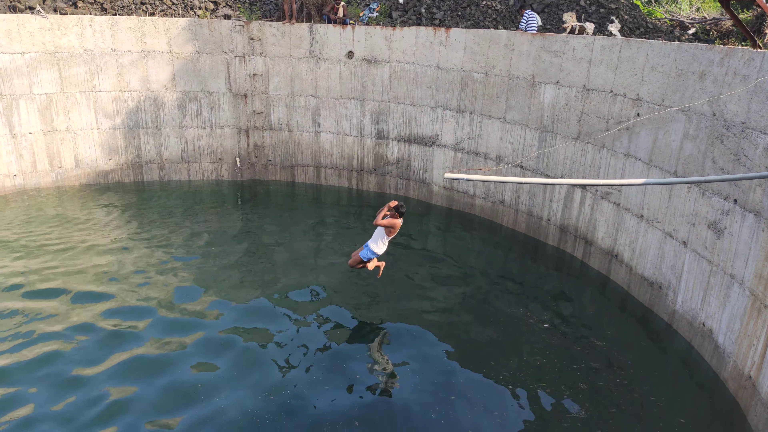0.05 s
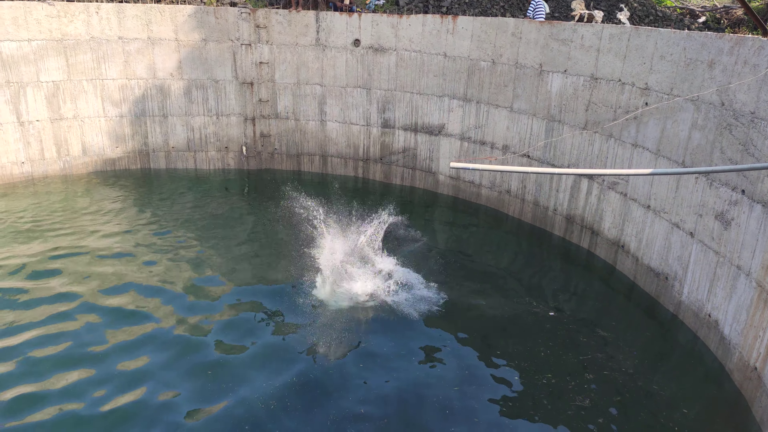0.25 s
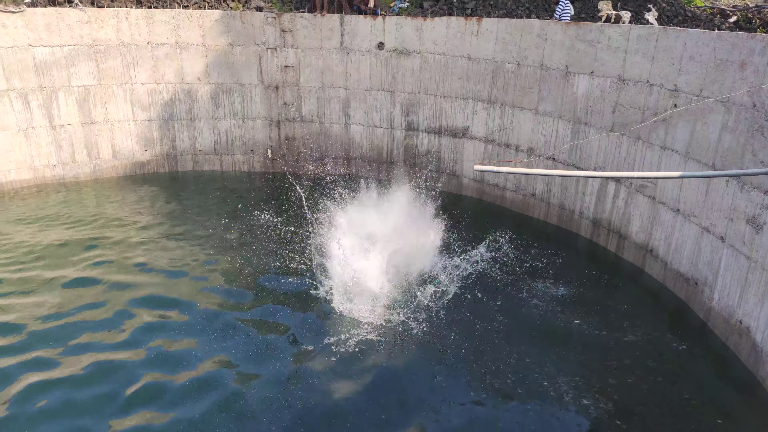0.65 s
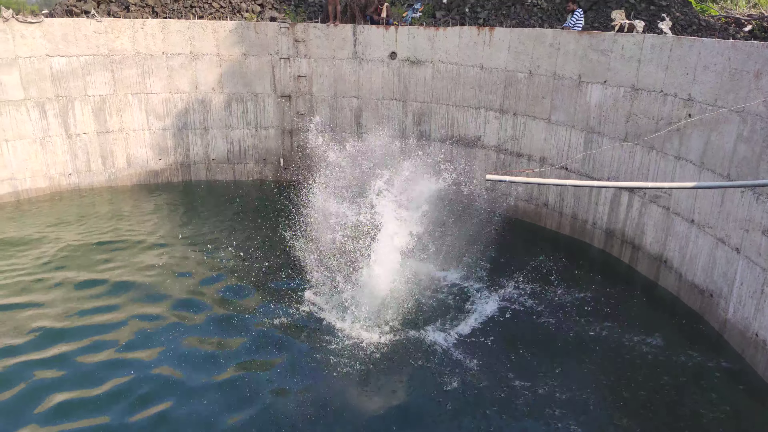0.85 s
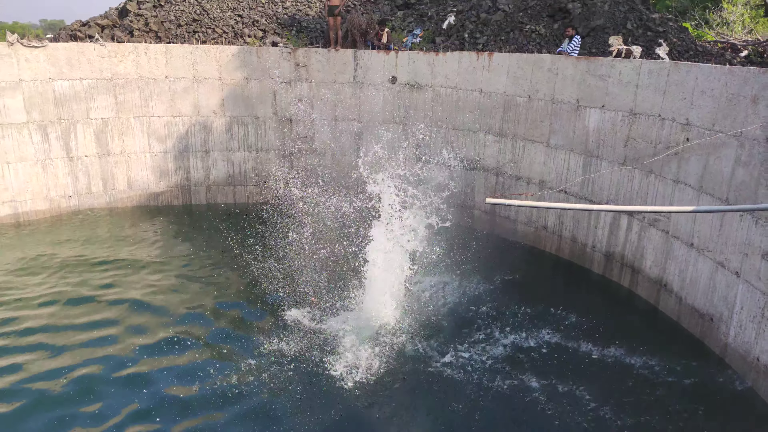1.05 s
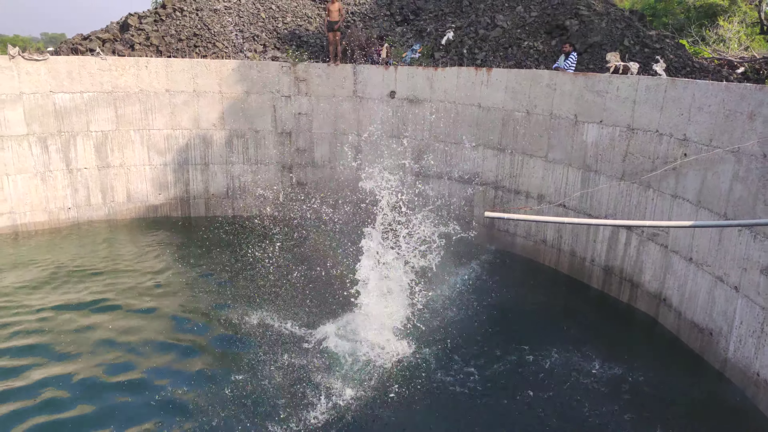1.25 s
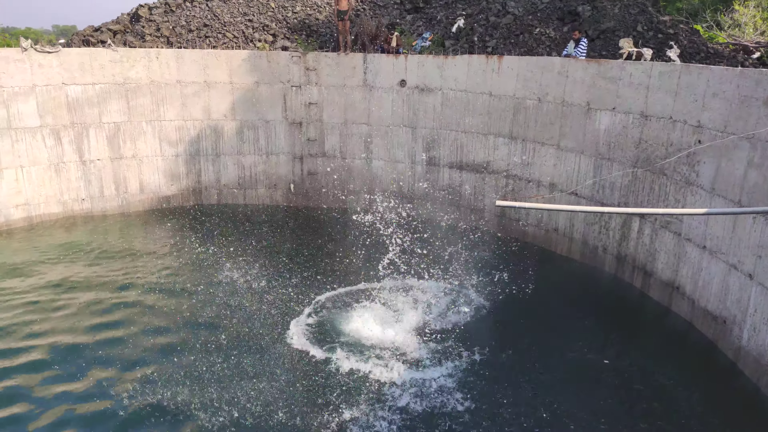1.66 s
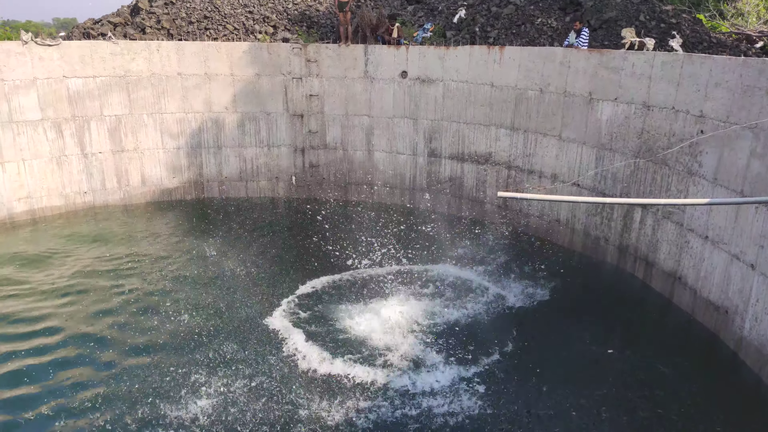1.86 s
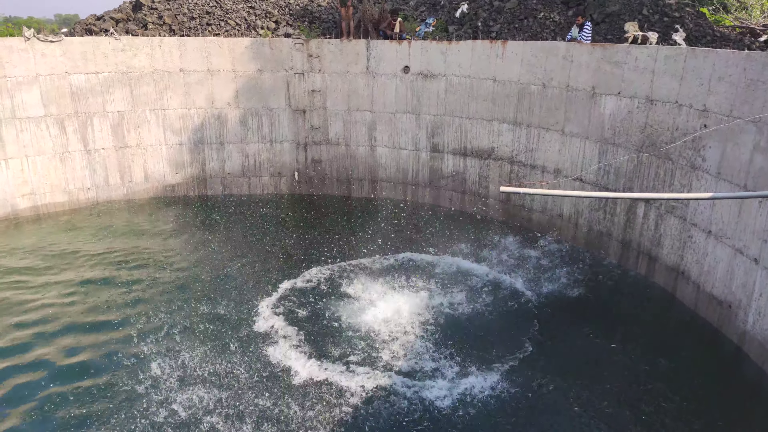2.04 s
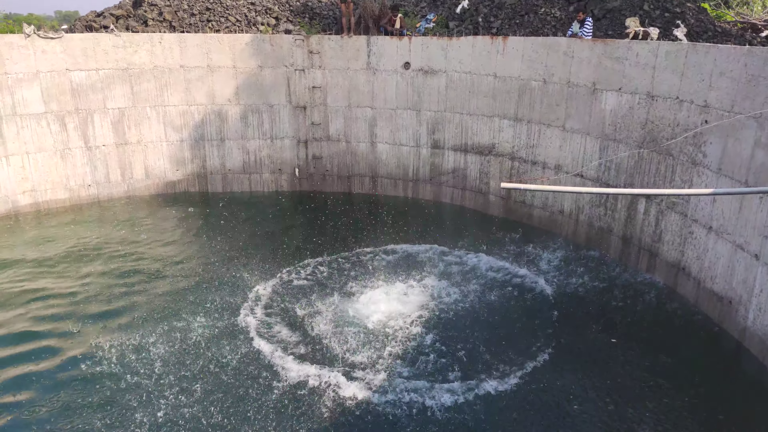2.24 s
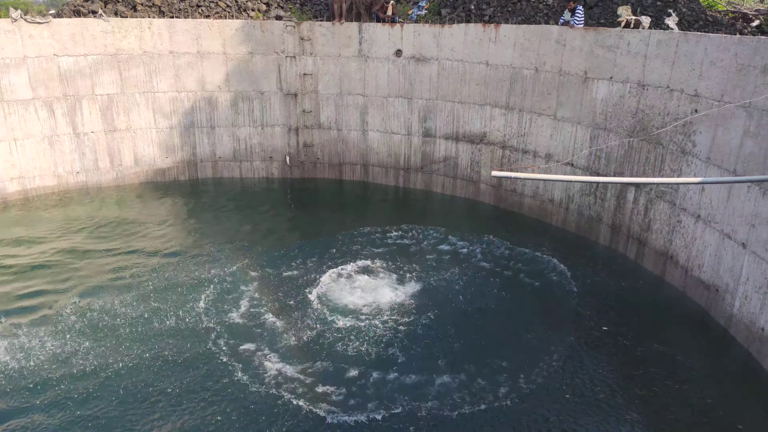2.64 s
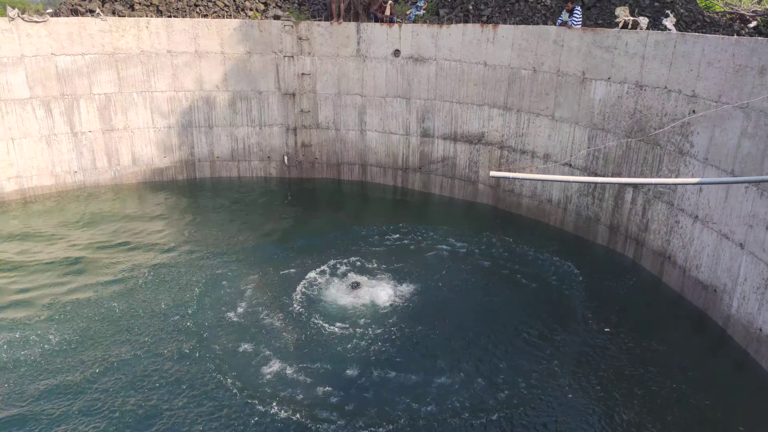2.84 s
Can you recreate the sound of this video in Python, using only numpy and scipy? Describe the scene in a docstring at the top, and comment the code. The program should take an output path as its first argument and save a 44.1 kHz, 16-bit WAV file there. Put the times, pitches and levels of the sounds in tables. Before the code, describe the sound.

A body splashes into a walled pool outdoors, slapping and churning the water. Hollow gulps follow, then fizzing, bubbling spray swells and fades with a slight echo. Soft wind puffs touch the microphone, which hears clearly only on the right.

```python
"""A person jumps into a wide stone well. Over quiet outdoor air and puffs of wind, feet and body slap the
water, which tears and churns. The air cavity caves in, pinches off with a plop and throbs. The thrown-up
spray rains back as drops and small bubbles, the central jet collapses with a gurgle, and the patter
swells, then thins to stray drops. The round wall echoes it all.
The left microphone is covered, so it hears only a muffled copy."""
import sys
import numpy as np
from scipy import signal
from scipy.fft import rfft, irfft, next_fast_len
from scipy.io import wavfile

SR = 44100
rng = np.random.default_rng(int(sys.argv[2]) if len(sys.argv) > 2 else 0)


def output_pcm(signal):
    """Save a mono or channel-first signal as 16-bit PCM at the path in sys.argv[1].

    Samples are clipped to [-1, 1] before scaling.
    """
    pcm = np.clip(np.atleast_2d(signal).T, -1, 1) * 32767
    wavfile.write(sys.argv[1], SR, np.round(pcm).astype(np.int16))


N = 132300

FINE_PER_S, HEAVY_PER_S = 5000, 2500  # density of fine and heavy drops


def undb(db):
    return 10 ** (np.asarray(db) / 20)


def clock():
    return np.arange(N) / SR


def unit(x):
    return x / np.sqrt(np.mean(x ** 2) + 1e-18)


def noise():
    return rng.standard_normal(N)


def add(out, start, sound):
    i = min(int(start * SR), N)
    out[i:i + len(sound)] += sound[:N - i]


def colour(x, points):
    """Minimum-phase EQ through (frequency [Hz], gain [dB]) points."""
    hz, db = np.array(points, float).T
    size = next_fast_len(2 * N)
    bin_hz = np.maximum(np.fft.rfftfreq(size, 1 / SR), 1)
    gain = undb(np.interp(np.log(bin_hz), np.log(hz), db))
    cepstrum = irfft(np.log(gain), size)
    cepstrum[1:size // 2] *= 2
    cepstrum[size // 2 + 1:] = 0
    return irfft(rfft(x, size) * np.exp(rfft(cepstrum)), size)[:N]


def shaped(x, envelope, points):
    """A steady texture through an envelope and an EQ; rms 1 where the envelope is 1."""
    return colour(x * envelope, points) / np.std(colour(x, points))


def swell(start, rise, hold, decay):
    """Linear attack, hold, exponential decay, all in seconds."""
    age = clock() - start
    return np.clip(age / rise, 0, 1) * np.exp(-np.maximum(age - rise - hold, 0) / decay)


def fader(points):
    """A gain ride through (time [s], level [dB]) points."""
    return undb(np.interp(clock(), *np.array(points).T))


def patter(per_s, spread_db, clumps_per_s=63, clump_db=1.0):
    """Random drop impacts of unequal size, louder and softer in clumps."""
    hit = rng.random(N) < per_s / SR
    clump = np.interp(clock() * clumps_per_s, np.arange(N), noise())
    return hit * np.sign(noise()) * undb(spread_db * np.minimum(noise(), 2.5) + clump_db * clump)


def ring(hz, t60, rise, glide):
    """A bubble: a dying sine whose pitch climbs by the share glide each second."""
    age = np.arange(int(t60 * SR) + 2) / SR
    tone = np.sin(2 * np.pi * hz * age * (1 + glide * age / 2))
    return tone * np.exp(-np.log(1000) * age / t60) * (1 - np.exp(-age / rise))


def outdoor_air():
    """A quiet, steady bed of dark noise."""
    # EQ of the air (frequency [Hz], gain [dB])
    air_eq = [(25, 0.5), (70, 0.5), (120, -9.5), (300, -10), (600, -8.5), (1000, -11), (2000, -16.5),
              (4000, -20), (6400, -25), (9000, -44), (16000, -83)]
    return undb(-61) * unit(colour(noise(), air_eq))


def wind():
    """Soft, low puffs blow across the open microphone."""
    # puffs (time [s], level [dB], half-width [s])
    puffs = [(0.058, -42, 0.012), (0.118, -49.5, 0.031), (.185, -53.5, 0.035), (0.304, -46, 0.026),
             (0.548, -37, 0.021), (1.29, -52, .025), (1.652, -59.5, 0.47), (1.996, -48.5, 0.033)]
    # their rumble (frequency [Hz], gain [dB])
    puff_eq = [(20, -12), (60, 4), (140, -0.5), (260, -7.5), (500, -20), (1500, -69)]
    gusts = sum(undb(db) * np.exp(-((clock() - at) / width) ** 2) for at, db, width in puffs)
    return shaped(noise(), gusts, puff_eq)


def wall_echo(x, predelay_s=0.042, t60_s=0.65):
    """The round stone wall returns a diffuse, warm tail."""
    # tone of the tail (frequency [Hz], gain [dB])
    wall_eq = [(60, 5.5), (350, 7.5), (1000, 4), (4000, -2.5), (15000, -10)]
    envelope = swell(predelay_s, rise=.01, hold=0, decay=t60_s / np.log(1000))
    tail = colour(unit(noise()) * envelope, wall_eq)
    return signal.fftconvolve(x, tail / np.linalg.norm(tail))[:N]


def stray_drops():
    """Lone drops go on falling as the spray thins; a few tick close by."""
    # swell and fade of the drops (time [s], level [dB])
    ride = [(.6, -86), (1.3, -59.5), (2.7, -51.5), (3, -78)]
    # their sparkle (frequency [Hz], gain [dB])
    stray_eq = [(1500, -22), (4000, -7), (6500, 11), (9000, 9), (12000, -17), (16000, -29)]
    # close drops (time [s], pitch [Hz], level [dB], t60 [s])
    ticks = [(2.509, 4300, -16, 0.0026), (2.5079, 5940, -18, 0.0024), (2.5101, 5240, -9.5, 0.0033),
             (2.625, 6700, -16, 0.0017), (2.7465, 6500, -16, 0.0024)]
    out = shaped(patter(per_s=90, spread_db=6), fader(ride), stray_eq)
    for start, hz, db, t60 in ticks:
        add(out, start, undb(db) * ring(hz, t60, rise=.5 / hz, glide=0))
    return out


def jet():
    """The central jet collapses and gurgles."""
    # swell and fade of the gurgle (time [s], level [dB])
    ride = [(1.25, -63), (1.42, -46), (1.55, -47), (1.8, -48), (2.2, -52.5), (2.6, -61), (3, -65)]
    # its hollow tone (frequency [Hz], gain [dB])
    gurgle_eq = [(50, -33), (130, -12), (250, 0.5), (380, 5), (550, -1), (900, -1), (2000, -53)]
    return shaped(patter(per_s=900, spread_db=4), fader(ride), gurgle_eq)


def bubbles(per_s=450, low_hz=1099, high_hz=7280, cycles=40, lifetime_glide=0.091):
    """Small bubbles trapped by the drops, each a short rising note."""
    out = np.zeros(N)
    for when, pitch, size, life in rng.random((int(per_s * N / SR), 4)):
        hz = low_hz * (high_hz / low_hz) ** pitch
        t60 = cycles * (.5 + life) / hz
        note = ring(hz, t60, rise=.5 / hz, glide=lifetime_glide / t60)
        add(out, when * N / SR, undb(-18 * size) * note)
    return unit(out)


def spray():
    """Fine and heavy drops rain back; bubbles follow the level of the heavy ones."""
    # falling spray, before mix gains (time [s], fine level [dB], heavy level [dB])
    rides = [(0.66, -47.5, -52), (0.81, -47.5, -48), (0.94, -46, -46), (1.13, -46.5, -49.5),
             (1.38, -46, -47.5), (1.66, -41, -42), (1.91, -39.5, -41.5), (2.08, -38.5, -41),
             (2.34, -41, -45), (2.54, -44, -49), (2.69, -48.5, -50.5), (2.82, -58, -56),
             (3.0, -64.5, -58.5)]
    # sizzle of fine drops (frequency [Hz], gain [dB])
    fine_eq = [(900, -30), (2000, -4), (2800, 1.5), (3500, 1), (4300, 3), (5300, -3), (6450, 3.5),
               (7200, -2.5), (8500, -7.5), (9800, -10.5), (12000, -18), (16000, -29.5)]
    # body of heavy drops (frequency [Hz], gain [dB])
    heavy_eq = [(100, -24.5), (200, -16.5), (320, -4.5), (500, -6.5), (800, 4), (1050, 2), (1400, -3),
                (1950, 2), (2600, -10.5), (5000, -27)]
    times, fine_db, heavy_db = np.array(rides).T
    start_s, rise_s = 0.587, 0.041
    onset = np.clip((clock() - start_s) / rise_s, 0, 1)
    fine_gain = onset * undb(np.interp(clock(), times, fine_db))
    heavy_gain = onset * undb(np.interp(clock(), times, heavy_db))
    fine = shaped(patter(FINE_PER_S, spread_db=1.5), fine_gain, fine_eq)
    heavy = shaped(patter(HEAVY_PER_S, spread_db=1.5), heavy_gain, heavy_eq)
    return undb(6) * fine + undb(5.5) * heavy + undb(-1) * heavy_gain * bubbles()


def spatters():
    """Lumps of water land with a short wet smack; the burst at 0.624 s is the cavity caving in."""
    # landings, plus the collapse burst at 0.624 s (time [s], band pitch [Hz], level [dB], decay [s])
    lumps = [(0.359, 2670, -31, 0.023), (.624, 1050, -31, 0.025), (0.864, 2850, -35.5, 0.0056),
             (0.871, 2860, -33.5, 0.0068), (1.42, 3000, -30.5, .004), (1.725, 970, -34, .04),
             (1.769, 1120, -30, 0.0086), (1.771, 6000, -30, 0.0022), (1.847, 4500, -27.5, 0.0041),
             (1.977, 4500, -30.5, .004), (2.053, 2300, -32, 0.027), (2.097, 3040, -30, 0.051),
             (2.151, 2510, -34.5, 0.083), (2.19, 1500, -31, 0.0047), (2.431, 3160, -27, 0.0035),
             (2.46, 3500, -28.5, 0.0052), (2.663, 1190, -60, 0.0076)]
    out = np.zeros(N)
    for start, hz, db, decay in lumps:
        band = signal.butter(1, [hz / 2.2, min(hz * 1.56, .45 * SR)], "bandpass", fs=SR, output="sos")
        smack = unit(signal.sosfilt(band, signal.sosfilt(band, noise())))
        out += undb(db) * swell(start, decay / 5, 0, decay) * smack
    return out


def cavity():
    """The cavity caves in with gulps, big air pockets pinch off and ring, and the bubble cloud throbs."""
    # low gulps (time [s], level [dB], decay [s])
    gulps = [(0.521, -36, 0.052), (.616, -29, 0.0096), (0.662, -34, 0.011), (0.737, -43, 0.0077),
             (1.406, -41, 0.0081)]
    # their throaty tone (frequency [Hz], gain [dB])
    gulp_eq = [(40, -4), (110, -0.5), (220, 1.5), (330, 4), (450, -5), (600, -1), (1000, -22), (2500, -42)]
    # low resonances of the cloud (frequency [Hz], gain [dB])
    cloud_eq = [(25, -7), (45, -6), (68, 0.5), (100, -4.5), (190, -4), (265, 1.5), (340, 3), (470, -4),
                (800, -16), (1500, -37.5)]
    # air pockets closing (time [s], pitch [Hz], level [dB], t60 [s])
    pockets = [(0.525, 245, -33, 0.05), (0.613, 56.7, -20, 0.059), (.62, 778, -14, 0.047),
               (0.621, 311, -19, 0.065), (.631, 1014, -21, 0.055), (0.664, 326, -19, 0.023),
               (0.667, 64, -30.5, 0.18), (0.733, 340.5, -30, 0.19), (0.777, 68.4, -34.5, 0.31),
               (0.787, 348, -31, 0.055), (.838, 335, -29.5, 0.066), (0.949, 69, -46.5, 0.8),
               (1.054, 828, -27.5, 0.06), (1.406, 413, -36, 0.018), (1.73, 790, -21, 0.034),
               (1.766, 960, -22, 0.028), (2.6, 810, -41, 0.087)]
    gulping = sum(undb(db) * swell(start, 0.0066, 0, decay) for start, db, decay in gulps)
    out = shaped(noise(), gulping, gulp_eq)
    throb = undb(-39.5) * swell(start=.615, rise=0.015, hold=0, decay=0.34)
    out += shaped(patter(per_s=900, spread_db=0), throb, cloud_eq)
    for start, hz, db, t60 in pockets:
        add(out, start, undb(db) * ring(hz, t60, rise=.004, glide=.5))
    return out


def body_splash():
    """Limbs and trunk slap the surface; the water tears and churns behind them and a mist settles."""
    # slaps on the water (time [s], level [dB], decay [s], thud relative to crack [dB])
    slaps = [(.2203, -26.5, 0.0019, -24), (0.2263, -35, 0.0025, 9), (0.2361, -18.5, 0.0003, -16),
             (0.2373, -25.5, .005, 3), (0.2433, -22.5, 0.0049, 0.5), (0.2803, -24, 0.0052, -7),
             (0.2872, -23.5, 0.0023, -2), (.307, -32, 0.0085, -2), (0.3588, -39, 0.012, 7)]
    # bright crack of the surface (frequency [Hz], gain [dB])
    crack_eq = [(150, -30), (900, -9), (2000, -1), (4200, 1), (5300, -1.5), (6500, 4), (8300, -7),
                (12000, -17), (16000, -32)]
    # low thud beneath it (frequency [Hz], gain [dB])
    thud_eq = [(50, -15), (190, -6), (270, 0.5), (380, 1.5), (520, -6.5), (680, -2), (850, 3.5), (1100, -3),
               (1500, -8), (4000, -44)]
    # mist landing around the crater (frequency [Hz], gain [dB])
    mist_eq = [(600, -5), (1400, -5), (2000, 8.5), (2800, 2), (4300, 1.5), (5300, -5), (6500, -1),
               (8500, -11), (16000, -32)]
    crack, thud = 0, 0
    for start, db, decay, thud_db in slaps:
        blow = undb(db) * swell(start, 0.0008, 0, decay)
        crack += blow
        thud += undb(thud_db) * blow
    out = shaped(noise(), crack, crack_eq) + shaped(noise(), thud, thud_eq)
    # grainy tails (level [dB], decay [s], EQ)
    tear, churn, mist = (-37.5, 0.098, crack_eq), (-34.5, 0.21, thud_eq), (-43, 0.44, mist_eq)
    for db, decay, eq in (tear, churn, mist):
        envelope = undb(db) * swell(start=0.218, rise=0.04, hold=0.055, decay=decay)
        out += shaped(patter(FINE_PER_S, spread_db=3), envelope, eq)
    return out


def covered_microphone(heard, water, lag_s=0.000093):
    """The cover muffles the scene and some extra wall echo; both arrive slightly late."""
    # loss through the cover (frequency [Hz], gain [dB])
    cover_eq = [(25, -2), (65, -7), (120, -14), (300, -16), (450, -16), (700, -24.5), (1200, -22),
                (2400, -29.5), (4400, -39), (7000, -53), (16000, -57)]
    # echo arriving by its own path (frequency [Hz], gain [dB])
    leak_eq = [(300, -9), (1000, -17.5), (3000, 3), (8000, 2)]
    leak = undb(-5) * colour(wall_echo(water), leak_eq)
    muffled = colour(heard + leak, cover_eq)
    return np.interp(clock() - lag_s, clock(), muffled)


def scene():
    """The left microphone hears the well through its cover, the right openly and with wind."""
    water = body_splash() + cavity() + spray() + stray_drops() + jet() + spatters()
    heard = water + undb(-18.5) * wall_echo(water) + outdoor_air()
    return np.array([covered_microphone(heard, water), heard + wind()])


def record(dry):
    """Microphone hiss and a steep top cut."""
    hiss = undb(-74.5) * rng.standard_normal(dry.shape)
    top_cut = signal.ellip(10, .2, 80, 15900, fs=SR, output="sos")
    return signal.sosfilt(top_cut, dry + hiss)


dry = scene()
out = record(dry)
output_pcm(out)
```